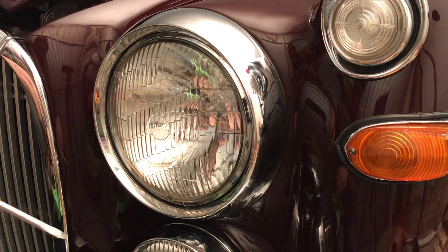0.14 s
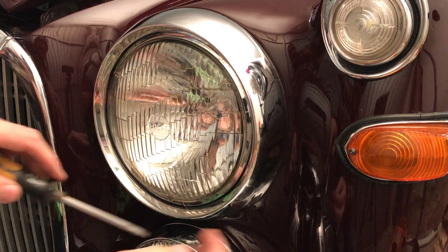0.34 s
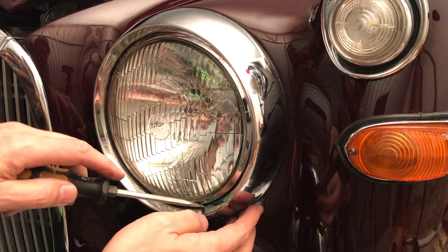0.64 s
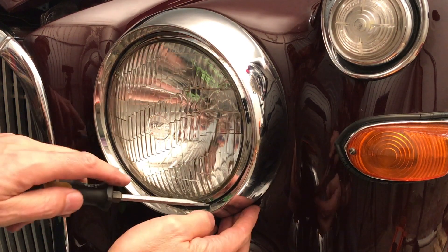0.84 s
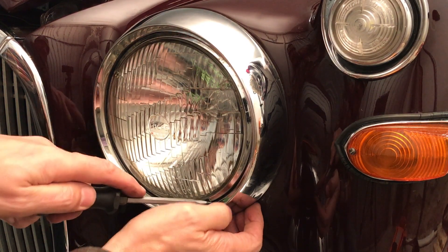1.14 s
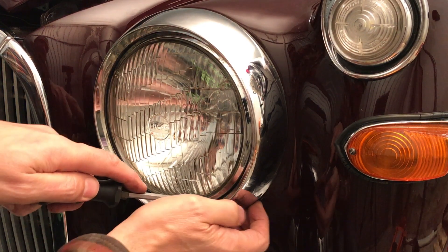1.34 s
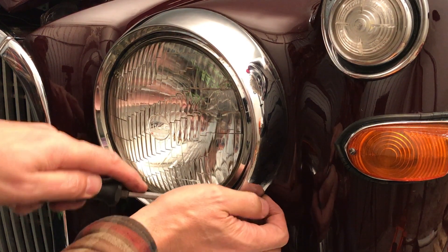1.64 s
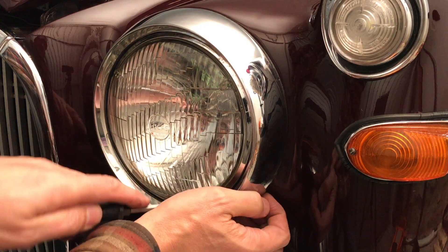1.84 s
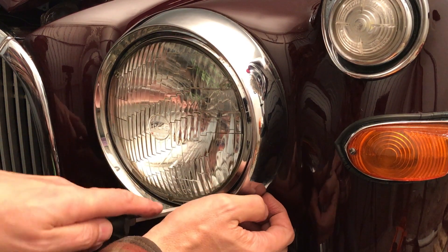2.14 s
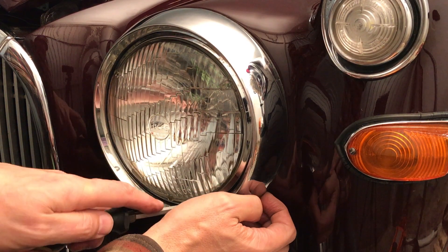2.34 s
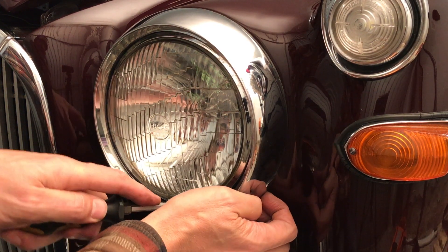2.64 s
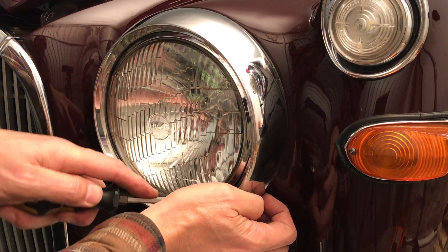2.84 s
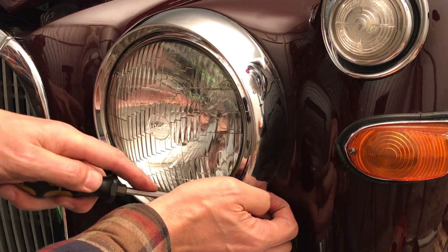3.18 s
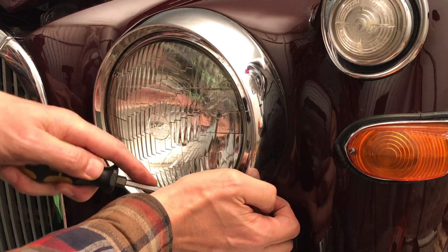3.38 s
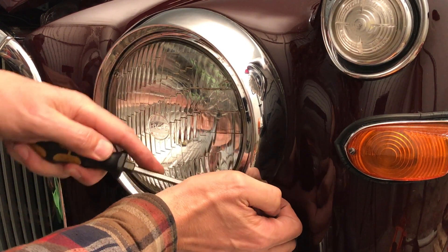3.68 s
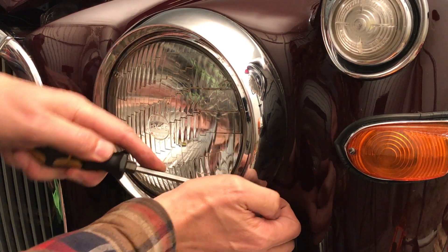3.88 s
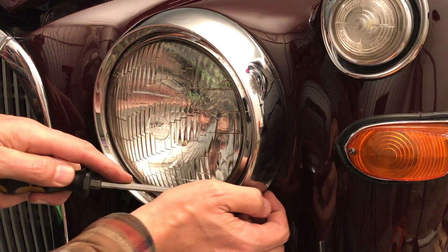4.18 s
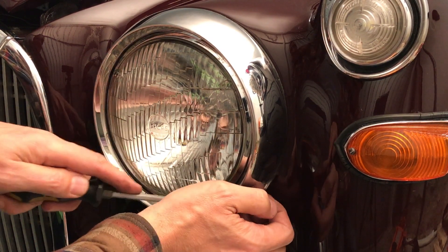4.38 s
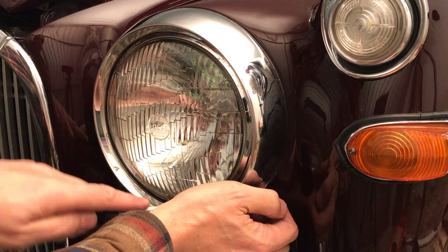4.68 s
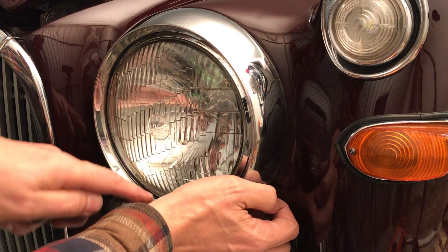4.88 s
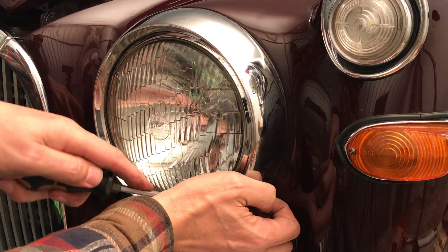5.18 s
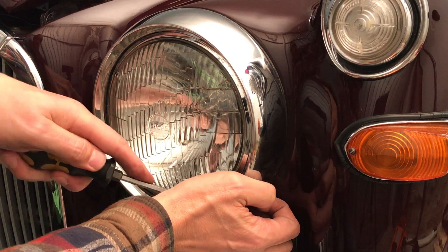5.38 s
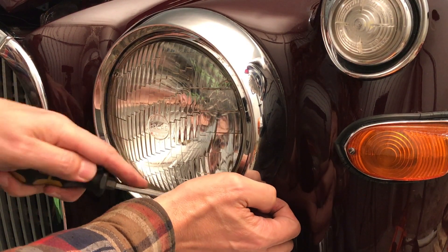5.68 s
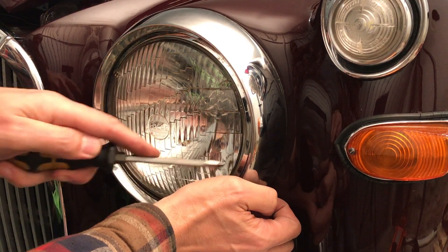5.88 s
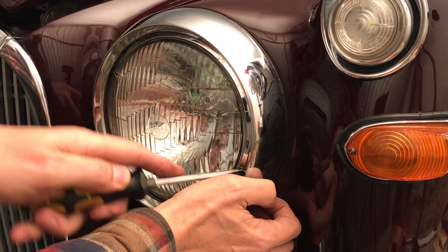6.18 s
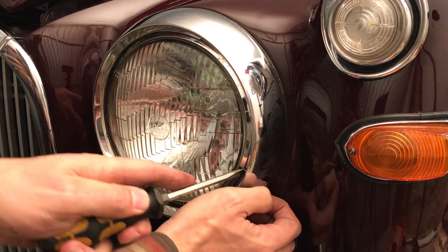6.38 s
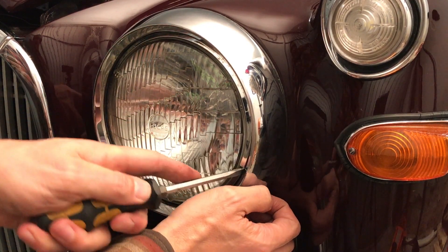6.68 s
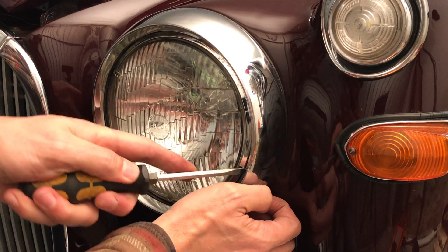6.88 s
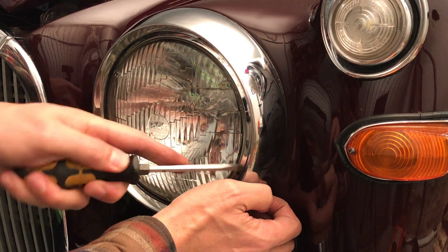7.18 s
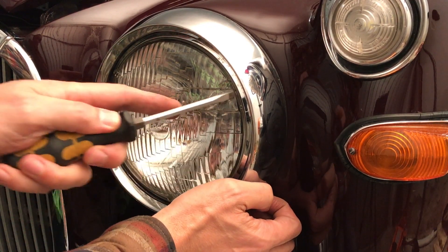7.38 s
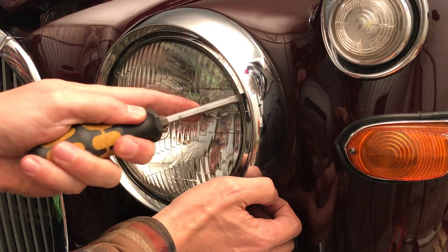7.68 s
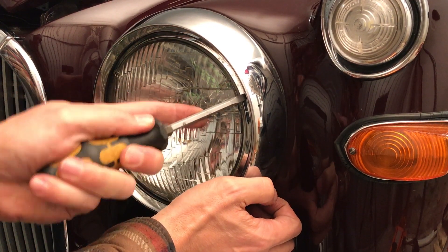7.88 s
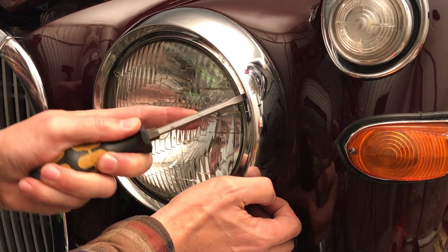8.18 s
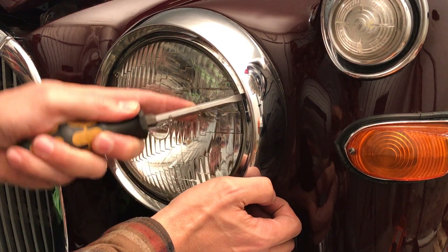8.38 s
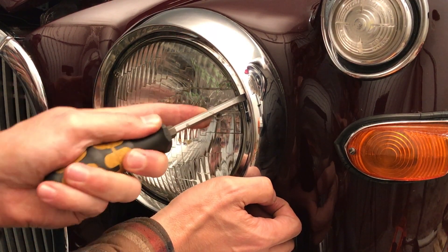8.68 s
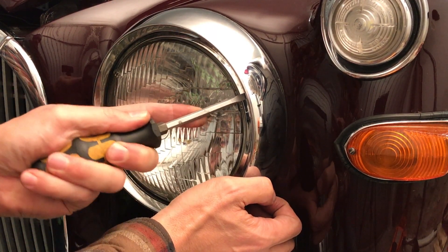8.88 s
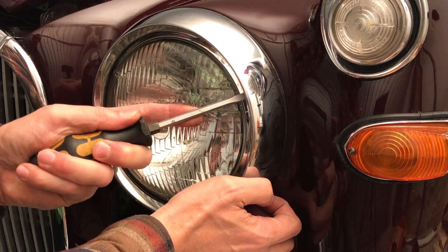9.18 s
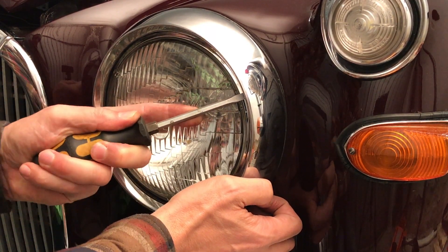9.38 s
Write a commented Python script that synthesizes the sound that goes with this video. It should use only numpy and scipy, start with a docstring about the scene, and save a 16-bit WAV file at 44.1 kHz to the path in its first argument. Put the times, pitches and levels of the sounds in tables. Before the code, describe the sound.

A close perspective in a hard-walled garage, with a faint low drone that wavers and thin room hiss. At 0.65 s a screwdriver clanks onto a metal ring, with a quick double knock and thump. Small ticks follow from 1.5 to 3.1 s, clustered around 2.2 and 2.6 s, with light finger rubbing. Between 3.2 and 3.8 s come gritty crunches, a soft thud and a short creak. A hard knock with a boomy panel thud lands at 4.15 s, then a clank and scrape at 4.5 s. Ticks continue from 5 s, with a clank at 5.8 and knocks near 6.1 s. A sharp snap cracks at 6.85 s. Tiny squeaks, a scrape and knocks occupy 7.3 to 7.8 s; dull knocks and a creak continue to 8.75 s. A crisp snap at 8.9 s leads to quickening ticks, and at 9.5 s the ring bursts free with a loud, chattering metallic crack and thump, cut short.

```python
"""A flat screwdriver levers the chrome trim ring off a car headlamp in a garage, until the ring springs free.
The blade ticks, scrapes and squeaks on the rim, its shaft rings, and the wing panel behind it thumps.
Ring, lamp bowl, wing and shaft are sets of fading tones plus short noise cracks, set off by snaps and grit.
Noise echoes from hard walls answer the work, over a wavering low drone and a faint hiss of noise."""
import sys
import numpy as np
from scipy import signal
from scipy.fft import rfft, irfft, next_fast_len
from scipy.io import wavfile
from scipy.ndimage import uniform_filter1d

SR = 44100
rng = np.random.default_rng(int(sys.argv[2]) if len(sys.argv) > 2 else 0)


def put_to_file(sound):
    """Save the sound as 16-bit audio at rate SR, in the file named by the first command-line argument."""
    columns = np.atleast_2d(sound).T  # one column per channel
    safe = np.clip(columns, -1, 1)
    whole_steps = np.round(safe * 32767)
    wavfile.write(sys.argv[1], SR, whole_steps.astype(np.int16))


N = 420536
HIT_SIZE = 16384  # samples in one hit
AGE = np.arange(HIT_SIZE) / SR  # seconds since a hit began
TIME = np.arange(N) / SR  # seconds since the scene began

# Tones of the trim ring: f/Hz, relative level/dB, time to fade by 60 dB/s
RING_TONES = [(1056, 5.5, 0.23), (1157, 0.5, 0.15), (1400, 0.5, 0.19), (1610, 4, .08), (1700, -5, .1),
              (1898, -2.5, 0.11), (2980, -2.5, 0.069)]
# Tones of the lamp bowl: f/Hz, relative level/dB, time to fade by 60 dB/s
BOWL_TONES = [(360.9, -0.5, 0.34), (522, -6, 0.064), (702, 5, 0.15), (1060, -4.5, 0.053)]
# Tones of the screwdriver shaft: f/Hz, relative level/dB, time to fade by 60 dB/s
SHAFT_TONES = [(1269, 4.5, .016), (2450, 3.5, 0.014), (2860, 7, 0.0065), (3390, -2, .016), (4310, 0, 0.031),
               (5650, 3.5, .009), (6170, -7.5, 0.031), (6680, -3.5, 0.017), (8600, -2.5, .008),
               (9680, -5.5, .08), (11460, -3.5, 0.02)]
# Colour of the ring's dense, quickly damped vibration: f/Hz, relative level/dB
RING_CRACK = [(400, -28.5), (1200, 7.5), (2700, -1), (4500, -9), (10000, -32)]
# Colour of gritty contact on the rim: f/Hz, relative level/dB
GRIT = [(100, -21.5), (450, -1), (1200, 0), (5500, -7.5), (8000, -20.5), (15500, -13.5)]


def undb(db):
    """Turn decibels into a gain."""
    return 10 ** (np.asarray(db) / 20)


def unit(x):
    """Scale to an rms (average strength) of 1."""
    return x / np.sqrt(np.mean(x ** 2))


def attack_unit(x):
    """Scale to an rms of 1 over the first 10 ms."""
    return x / np.sqrt(np.mean(x[:SR // 100] ** 2))


def fade(t, t60):
    """Die away steadily, by 60 dB in t60 seconds."""
    return np.exp(-np.log(1000) * t / t60)


def colour(x, points):
    """Filter through (Hz, dB) points without sounding ahead of the input."""
    size = next_fast_len(len(x) // 2 + 1) * 4
    hz, db = np.transpose(points)
    log_hz = np.log(np.fft.rfftfreq(size, 1 / SR) + 1)
    gain = undb(np.interp(log_hz, np.log(hz), db))
    # folding the cepstrum (the spectrum of the log gain) forward in time makes the filter causal
    cepstrum = irfft(np.log(gain))
    cepstrum[1:size // 2] *= 2
    cepstrum[size // 2 + 1:] = 0
    response = np.exp(rfft(cepstrum))
    return irfft(rfft(x, size) * response)[:len(x)]


def walk(rate):
    """Wander smoothly and at random with rms 1, heading for a new value `rate` times a second."""
    size = int(SR / rate)
    steps = np.repeat(rng.standard_normal(N // size + 1), size)
    return unit(uniform_filter1d(steps, size)[:N])


def grains(size, spread_db):
    """Sparse random pulses, many weak and a few strong, for rough contact or grainy noise."""
    chance = rng.random(size) < .05
    bump = rng.standard_normal(size)
    boost_db = spread_db * np.minimum(rng.exponential(size=size), 5)
    return unit(chance * bump * undb(boost_db))


def add(track, start, sound):
    """Mix a sound in at a time in seconds."""
    i = min(max(int(start * SR), 0), N - 1)
    track[i:i + len(sound)] += sound[:N - i]


def swells(rows, attack, release):
    """Gain that rises, holds and falls once for each (start, length, dB) row."""
    gain = 0
    for start, length, db in rows:
        rise = np.clip((TIME - start) / attack, 0, 1)
        fall = np.clip(1 - (TIME - start - length) / release, 0, 1)
        gain = gain + undb(db) * rise * fall
    return gain


def ring_out(modes, detune, scatter_db=3):
    """Tones (modes) struck at a new spot: each has a random strength and, as the load changes, a shifted pitch."""
    hz, db, t60 = np.transpose(modes)[:, :, None]
    strength, shift, side = rng.standard_normal((3, len(modes), 1))
    waves = np.sin(2 * np.pi * hz * (1 + detune * shift) * AGE) * fade(AGE, t60)
    gain = np.sign(side) * undb(db + scatter_db * strength)
    return attack_unit(np.sum(gain * waves, axis=0))


def struck(force, modes, points, crack_t60, modes_db, detune=0.006):
    """A part's answer to a force: a crack of dense damped vibration, with its clear tones."""
    noise = rng.standard_normal(HIT_SIZE) * fade(AGE, crack_t60)
    burst = rfft(signal.fftconvolve(force, noise)[:HIT_SIZE])
    # partly even out the noise burst's spectrum, for a denser crack of steadier level
    even = irfft(burst / np.sqrt(np.abs(burst) + 1e-9))
    even = even * (1 - AGE / AGE[-1]) ** 2
    crack = attack_unit(colour(even, points))
    clear = signal.fftconvolve(force, ring_out(modes, detune))[:HIT_SIZE]
    return attack_unit(crack + undb(modes_db) * attack_unit(clear))


def background():
    """A low drone, a sine with wandering pitch, swells and wavers under filtered room noise and hiss."""
    # Swells of the drone: t/s, length/s, level/dB
    drone_swells = [(4.3, 1.06, -49), (6.35, 0.41, -46.5), (6.85, 0.91, -51.5), (8.5, 0.35, -45)]
    # Colour of the room noise: f/Hz, relative level/dB
    air_colour = [(20, -14), (50, 0), (75, 3.5), (140, -6), (250, -15.5), (500, -23.5), (1000, -24.5),
                  (2500, -34.5), (10500, -42.5), (12200, -32), (15600, -29)]
    drone_hz, drone_db, air_db = 47.8, -58, -59.5
    pitch = drone_hz * (1 + .012 * walk(1.2))
    strength = undb(drone_db) + swells(drone_swells, attack=0.25, release=.25)
    tone = unit(np.sin(2 * np.pi * np.cumsum(pitch) / SR))
    drone = tone * strength * undb(1.3 * walk(16))
    air = unit(colour(rng.standard_normal(N), air_colour)) * undb(air_db + 0.7 * walk(25))
    return drone + air


def rubbing(uneven_db=4.0, creep_db=-7):
    """Fingers shifting their grip and the loaded rim creep in uneven little steps, made of grit noise."""
    # Rubs of the fingers: t/s, length/s, level before creep_db lowers it/dB
    rub_rows = [(1.78, 0.45, -62), (3.25, 0.62, -61.5), (4.03, 0.64, -57), (5.38, 0.19, -64),
                (7.45, 0.41, -57.5), (8.3, 0.64, -70.5), (9.15, 0.59, -59)]
    # Colour of the rubbing: f/Hz, relative level/dB
    rub_colour = [(80, -4.5), (200, 4.5), (1000, 4.5), (2000, -6), (6000, -13.5), (15500, -25)]
    resting_db = -74  # hands at rest, also before creep_db
    pressure = undb(resting_db) + swells(rub_rows, attack=0.041, release=.1)
    friction = unit(colour(grains(N, spread_db=1.85), rub_colour))
    return friction * pressure * undb(creep_db + uneven_db * walk(35))


def garage(x, gap=0.0041, build=0.0027):
    """Dense wall echoes, made of fading noise bands, build up within milliseconds; the bass lingers longest."""
    # Echo of the walls: f/Hz, time to fade by 60 dB/s, level/dB
    wall_bands = [(109, 0.96, 8.5), (237.6, 0.75, 3.5), (525, 0.46, -1.5), (1414, 0.35, -6),
                  (4470, .34, -7.5), (9950, 0.13, -12), (15000, 0.3, -14)]
    t = np.arange(SR) / SR
    hz, t60, db = np.transpose(wall_bands)
    noise = rfft(rng.standard_normal(SR))
    log_hz = np.log(np.arange(len(noise)) + 1)
    echo = np.zeros(SR)
    for band, decay, gain in zip(np.eye(len(hz)), t60, undb(db)):
        shape = np.clip((t - gap) / build, 0, 1) * fade(t, decay)
        band_noise = irfft(noise * np.interp(log_hz, np.log(hz), band), SR)
        echo += gain * band_noise * shape / np.linalg.norm(shape)
    return signal.fftconvolve(x, echo)[:N]


def standing_wave(x, hz=153.36, gain_db=10.5, t60=1.2):
    """A standing wave between the walls hums on at one low pitch after each thud."""
    decay = fade(TIME, t60)
    hum = 2 * np.sin(2 * np.pi * hz * TIME) * decay / decay.sum()
    return undb(gain_db) * signal.fftconvolve(x, hum)[:N]


def clicks(rows, chatter, slip, side_s=6.7, side_db=6, light_db=-52.5):
    """Each slip is one snap and a dying chatter, felt by ring, lamp bowl and rim edge together."""
    # Colour of the lamp bowl's crack: f/Hz, relative level/dB
    bowl_crack = [(70, -15.5), (300, -0.5), (1000, 2), (2000, -31), (4000, -40)]
    # Colour of the sharp edge's crack, before the top is tilted: f/Hz, relative level/dB
    edge_crack = [(1200, -19), (4300, -1.5), (6200, 1.5), (7500, -5), (11000, -5.5), (15500, -1.5)]
    out = np.zeros(N)
    for start, ring_db, bowl_db, edge_db in rows:
        force = chatter * grains(HIT_SIZE, spread_db=-1.5) * np.exp(-AGE / slip)
        force[0] += 1
        # heavy blows dull the top; once the blade has moved up the side of the ring, it bites more sharply
        dull_db = np.clip(0.5 * (ring_db - light_db), 0, 6)
        top_db = side_db * (start > side_s) - dull_db  # dB per octave above 7 kHz
        edge_colour = [(hz, db + top_db * max(np.log2(hz / 7000), 0)) for hz, db in edge_crack]
        ring = struck(force, RING_TONES, RING_CRACK, crack_t60=0.043, modes_db=-10.5)
        bowl = struck(force, BOWL_TONES, bowl_crack, crack_t60=0.039, modes_db=-13.0)
        # the blade is at the edge, so the shaft's tones sound with it
        edge = struck(force, SHAFT_TONES, edge_colour, crack_t60=0.029, modes_db=-20)
        add(out, start, undb(ring_db) * ring + undb(bowl_db) * bowl + undb(edge_db) * edge)
    return out


def ticks():
    """The blade tip snaps off the rim and excites mostly the sharp edge; ring and bowl get fixed shares."""
    # Ticks of the blade tip: t/s, level at the edge/dB
    tick_rows = [(0.6389, -39), (1.522, -59), (2.1809, -52.5), (2.2136, -40.5), (2.557, -39),
                 (2.6354, -40.5), (3.0149, -48), (3.1083, -52.5), (5.0249, -41.5), (5.2175, -56.5),
                 (5.3698, -45), (5.8163, -37), (6.39, -61.5), (6.8546, -32), (8.0307, -51.5),
                 (8.2067, -40.5), (8.4435, -55.5), (8.8947, -35), (8.9244, -46), (9.1083, -40.5),
                 (9.276, -38), (9.2996, -42), (9.3643, -42.5), (9.4786, -44.5)]
    ring_share_db, bowl_share_db = -14, -21
    rows = [(start, db + ring_share_db, db + bowl_share_db, db) for start, db in tick_rows]
    return clicks(rows, chatter=0.098, slip=0.0056)


def clanks(chatter=0.098, slip=0.004):
    """The blade strikes the rim freely: a sharp blow and brief chatter set all the shaft's tones ringing."""
    # Clanks of the shaft: t/s, level/dB
    clank_rows = [(0.6391, -32), (.657, -36.5), (0.6686, -41.5), (4.4936, -35.5), (5.8158, -31.5),
                  (6.1016, -37.5), (7.566, -40)]
    out = np.zeros(N)
    for start, db in clank_rows:
        force = chatter * grains(HIT_SIZE, spread_db=1) * np.exp(-AGE / slip)
        force[0] += 1
        ringing = ring_out(SHAFT_TONES, detune=.005, scatter_db=0.5)
        shaft = signal.fftconvolve(force, ringing)[:HIT_SIZE]
        add(out, start, undb(db) * attack_unit(shaft))
    return out


def thumps(below_db=-12, above_db=-18.5):
    """The lever pushes the wing, which thuds around one pitch; the panel's tones near that pitch boom on."""
    # Pushes on the wing: t/s, level/dB, pitch f/Hz
    thump_rows = [(.642, -48.5, 173), (.705, -47.5, 170), (2.945, -56, 133), (3.572, -43.5, 198),
                  (4.146, -39, 117), (4.148, -37, 285), (4.497, -43, 164), (5.665, -40.5, 142),
                  (6.105, -51, 217), (6.156, -38, 195), (7.28, -56, 150), (7.572, -43, 180),
                  (7.797, -45, 200), (8.292, -48, 173), (8.66, -50, 163), (8.75, -52, 172),
                  (9.520, -29, 151)]
    # Tones of the wing panel: f/Hz, relative level/dB, time to fade by 60 dB/s
    wing_tones = [(87, 0.5, 0.16), (135, -4, 0.17), (153.16, -1, 0.71), (215.9, 4.5, 0.31),
                  (266.2, -1, 0.31)]
    out = np.zeros(N)
    push = np.ones(1)
    for start, db, hz in thump_rows:
        low_side = [(hz / 8, 3 * below_db), (hz / 2.5, below_db), (hz / 1.3, 0)]
        high_side = [(hz * 1.2, 0), (hz * 2.5, above_db), (hz * 12, -60)]
        modes = [(f, mode_db - 10 * np.log2(f / hz) ** 2, t60) for f, mode_db, t60 in wing_tones]
        thud = struck(push, modes, low_side + high_side, crack_t60=0.06, modes_db=-11.0)
        first_25_ms = thud[:SR // 40]
        add(out, start, undb(db) * thud / np.sqrt(np.mean(first_25_ms ** 2)))
    return out


def knocks(ring_share_db=1.5, ring_growth=0.32, medium_db=-48):
    """The ring jumps in its seat: the harder the knock, the more the whole ring sounds."""
    # Knocks: t/s, level/dB, depth/dB (above 0 more in the bowl, below 0 more in the sharp edge)
    knock_rows = [(0.7015, -45, -14), (0.7086, -42.5, 4), (1.732, -55, 5), (2.0035, -52.5, -2),
                  (2.669, -51.5, -5), (2.9422, -44, 1), (3.343, -53.5, -5), (3.534, -53, -5.5),
                  (3.5699, -52, 2), (4.124, -62, 6), (4.1456, -29, 4), (4.2699, -48.5, -3),
                  (4.397, -53, -6), (4.4942, -41, -7.5), (5.403, -58.5, 5), (5.447, -59, 7.5),
                  (5.493, -58.5, 6.5), (5.513, -59.5, 5), (5.6661, -50.5, 3.5), (6.101, -47, -2),
                  (6.1541, -40.5, -5), (7.4639, -57, 5.5), (7.5673, -44, -2), (7.5917, -44, -3),
                  (7.797, -46.5, 8), (8.292, -46, 7.5), (8.6527, -53.5, -5)]
    rows = []
    for start, db, depth_db in knock_rows:
        ring_db = db + ring_share_db + ring_growth * (db - medium_db)
        rows.append((start, ring_db, db + depth_db, db - depth_db))
    return clicks(rows, chatter=0.096, slip=0.0026)


def scrapes(landing=7, firm_db=-45, softening=0.32):
    """The blade lands, then sticks and slips: it rasps on the rim and keeps the shaft ringing."""
    # Scrapes: t/s, length/s, level of the grit/dB, level of the ringing shaft/dB
    scrape_rows = [(.703, 0.012, -42.5, -45), (4.14, 0.01, -43, -41), (4.526, 0.015, -39, -44),
                   (5.661, 0.035, -51.5, -52), (6.106, 0.051, -51.5, -46), (7.567, 0.031, -42.5, -44),
                   (9.493, 0.059, -48, -58)]
    out = np.zeros(N)
    for start, length, grit_db, shaft_db in scrape_rows:
        stroke = np.exp(-(AGE / length) ** 4)
        force = grains(HIT_SIZE, spread_db=3.0) * stroke
        # every spot on the rim colours the rasp differently
        rim = struck(force, RING_TONES, RING_CRACK, crack_t60=.02, modes_db=-9.0)
        grit = unit(colour(force, GRIT)) + .5 * unit(rim)
        force[0] += landing * min(undb(max(grit_db, shaft_db) - firm_db), 1)  # soft strokes glide in
        # a gentle touch hardly reaches the shaft's high tones
        tilt_db = min(softening * (shaft_db - firm_db), 0)
        lowest_hz = SHAFT_TONES[0][0]
        modes = [(hz, db + tilt_db * np.log2(hz / lowest_hz), t60) for hz, db, t60 in SHAFT_TONES]
        ringing = ring_out(modes, scatter_db=1.5, detune=.005)
        shaft = unit(signal.fftconvolve(force, ringing)[:HIT_SIZE])
        mix = undb(grit_db) * unit(grit) + undb(shaft_db) * shaft
        add(out, start, np.sqrt(stroke.mean()) * mix)
    return out


def crunches(catches_per_s=90, catch_s=.0012, bed=0.22):
    """The loaded rim gives small catches at uneven intervals, each a tiny burst of grit, over a thin rasp."""
    # Crunches: t/s, length/s, level/dB
    crunch_rows = [(1.801, .02, -63), (3.248, 0.05, -61.5), (3.348, 0.035, -61.5), (3.468, 0.07, -68.5),
                   (3.562, .016, -55), (3.693, .02, -53.5), (7.282, 0.024, -60)]
    out = np.zeros(N)
    for start, length, db in crunch_rows:
        rate = catches_per_s * np.repeat(rng.uniform(.3, 1.7, HIT_SIZE // 256), 256)
        since_catch = np.cumsum(rate) / SR % 1 / rate  # seconds
        stroke = np.exp(-(AGE / length) ** 4)
        force = grains(HIT_SIZE, spread_db=1.5) * (bed + np.exp(-since_catch / catch_s)) * stroke
        add(out, start, undb(db) * np.sqrt(stroke.mean()) * unit(colour(force, GRIT)))
    return out


def slides(uneven_db=3):
    """The blade glides: fine, dense friction makes the shaft sing in bands that differ with the contact spot."""
    # Slides: t/s, length/s, level/dB
    slide_rows = [(3.7, 0.071, -56.5), (3.92, .07, -63.5), (7.402, 0.148, -65.5), (8.634, 0.037, -60)]
    force = grains(N, spread_db=2) * undb(uneven_db * walk(60))
    out = np.zeros(N)
    for row in slide_rows:
        singing = signal.fftconvolve(force, ring_out(SHAFT_TONES, detune=0.014))[:N]
        out += unit(singing) * swells([row], attack=0.044, release=0.013)
    return out


def creaks(slip_hz=330, sag_per_s=3.3, jitter=0.1):
    """The loaded ring sticks and slips in its seat: uneven catches that slow as the load eases drive the bowl."""
    # Creaks: t/s, length/s, level/dB
    creak_rows = [(3.737, 0.047, -48), (8.654, 0.029, -49), (8.737, 0.027, -53.5)]
    # Colour of the creak: f/Hz, relative level/dB
    creak_colour = [(250, -14), (750, 8), (1500, -5.5), (3200, -14.5), (6000, -23), (14000, -37.5)]
    out = np.zeros(N)
    for start, length, db in creak_rows:
        unsteady = np.repeat(rng.standard_normal(HIT_SIZE // 128), 128)
        slips_per_s = slip_hz * np.exp(jitter * unsteady - sag_per_s * AGE)
        turns = np.cumsum(slips_per_s) / SR
        stroke = np.exp(-(AGE / length) ** 4)
        force = np.diff(np.floor(turns), prepend=-1) * stroke  # one pulse for each whole turn
        body = struck(force, BOWL_TONES, creak_colour, crack_t60=.03, modes_db=-11, detune=0.02)
        add(out, start, undb(db) * np.sqrt(stroke.mean()) * unit(body))
    return out


def fine_hiss():
    """A thin, grainy hiss of sparse random noise pulses hangs on for about half a second after two slips."""
    # Hiss: start t/s, end t/s, level/dB
    hiss_rows = [(6.86, 7.254, -65.5), (8.906, 9.53, -65.5)]
    gain = sum(undb(db) * ((TIME > start) & (TIME < end)) for start, end, db in hiss_rows)
    grain = grains(N, spread_db=0.5) * undb(walk(50))
    return uniform_filter1d(gain, SR // 50) * grain  # 20 ms fades


def squeaks(rough_hz=55, rise=.08):
    """Stick-slip on the chrome locks into a rough tone and its octave, rising by a share as pressure grows."""
    # Squeaks: t/s, length/s, starting pitch f/Hz, level/dB, level of the octave/dB
    squeak_rows = [(7.276, 0.038, 1157, -59.5, -58), (7.675, .125, 3630, -72, -88)]
    out = np.zeros(N)
    for start, length, hz, db, octave_db in squeak_rows:
        progress = np.minimum(AGE / length, 1)
        pitch = hz * (1 + rise * progress) + rough_hz * walk(500)[:HIT_SIZE]
        phase = 2 * np.pi * np.cumsum(pitch) / SR
        stroke = np.sqrt(np.abs(np.sin(np.pi * progress)))
        tones = undb(db) * np.sin(phase) + undb(octave_db) * np.sin(2 * phase)
        add(out, start, stroke * tones)
    return out


def release():
    """The ring springs off: one heavy snap with strong chatter, a loud burst that the scene's end cuts short."""
    start, ring_db, bowl_db, edge_db = 9.520, -19, -20, -16
    return clicks([(start, ring_db, bowl_db, edge_db)], chatter=0.13, slip=0.043)


def scene():
    """The work on the lamp, its echo and the background."""
    hits = ticks() + clanks() + thumps() + knocks() + release()
    friction = rubbing() + scrapes() + crunches() + slides() + creaks() + squeaks()
    work = hits + friction
    room = garage(work) + standing_wave(work)
    return (work + room + fine_hiss() + background())[None]


def record(dry):
    """Cut the deepest rumble, below 36 Hz, and the very top, above 15.9 kHz."""
    rumble_cut = signal.butter(4, 36, "high", fs=SR, output="sos")
    top_cut = signal.ellip(10, .2, 80, 15900, fs=SR, output="sos")
    thinned = signal.sosfilt(rumble_cut, dry)
    return signal.sosfilt(top_cut, thinned)


dry = scene()
out = record(dry)
put_to_file(out)
```